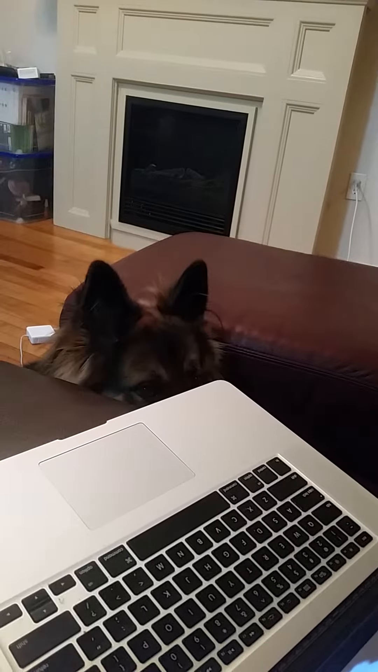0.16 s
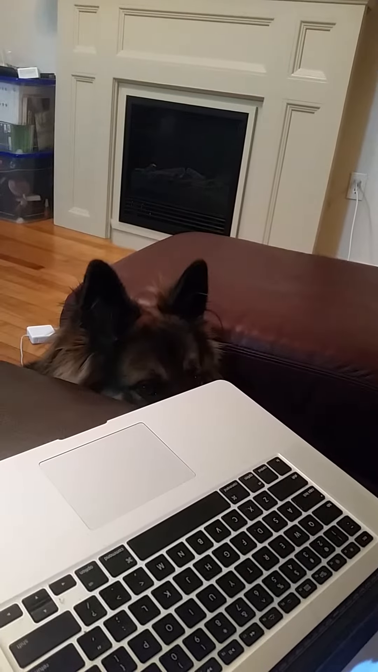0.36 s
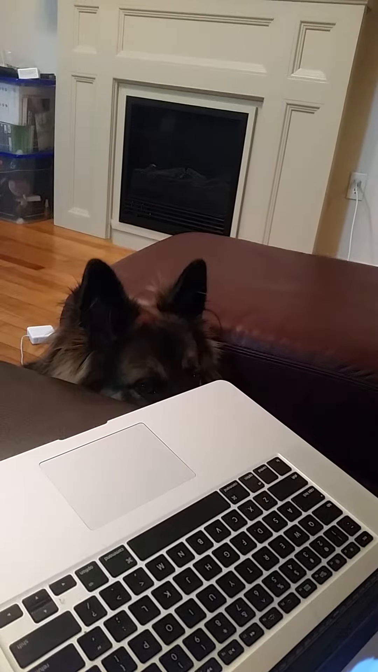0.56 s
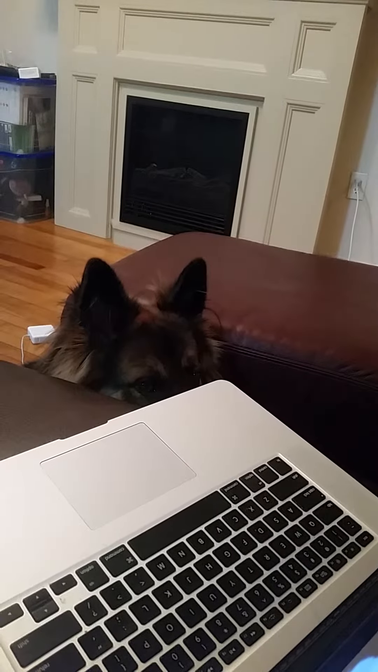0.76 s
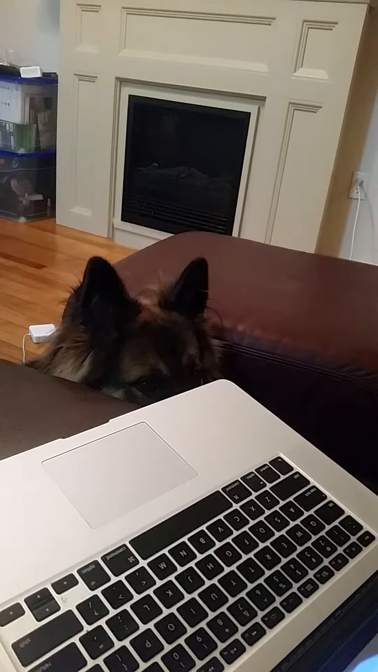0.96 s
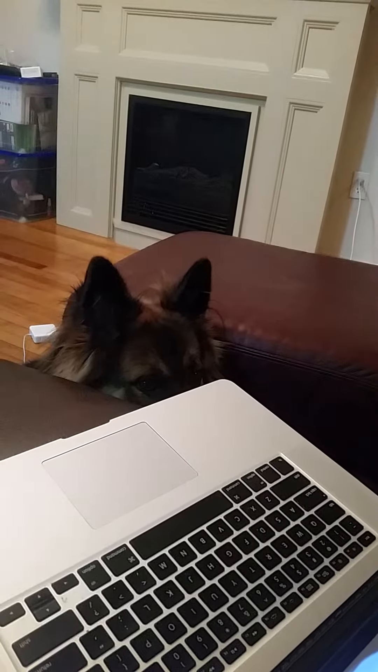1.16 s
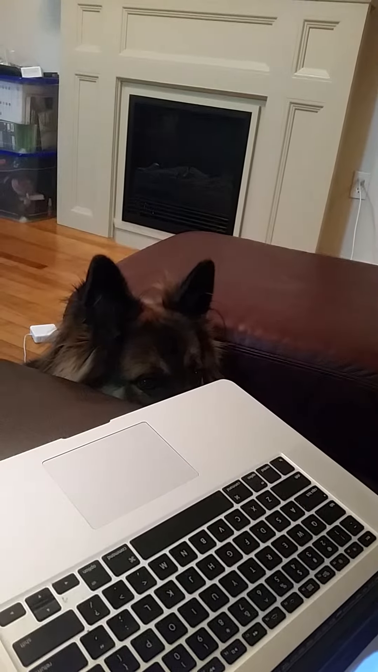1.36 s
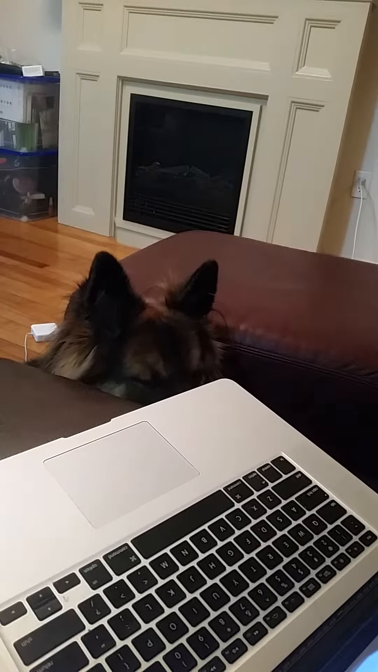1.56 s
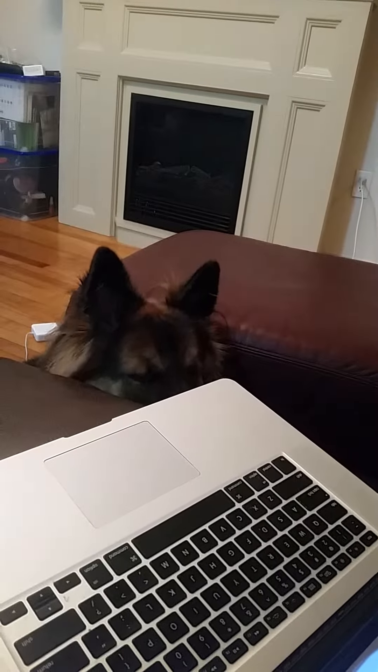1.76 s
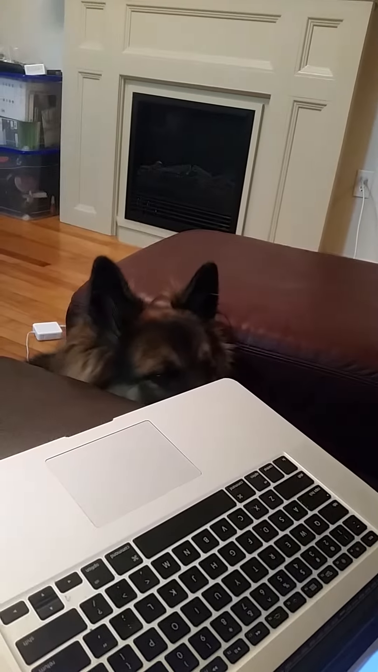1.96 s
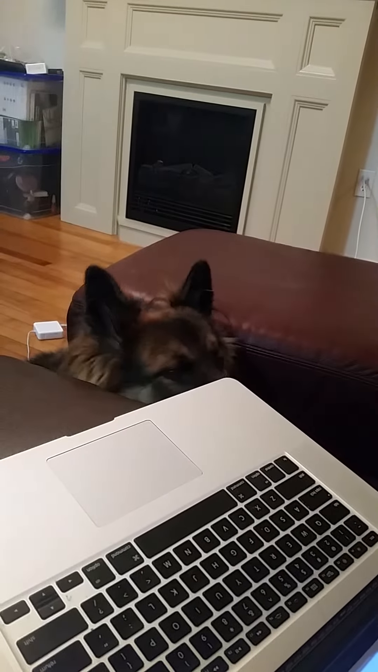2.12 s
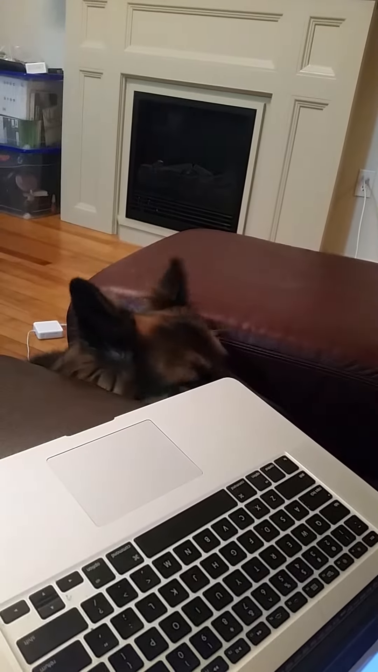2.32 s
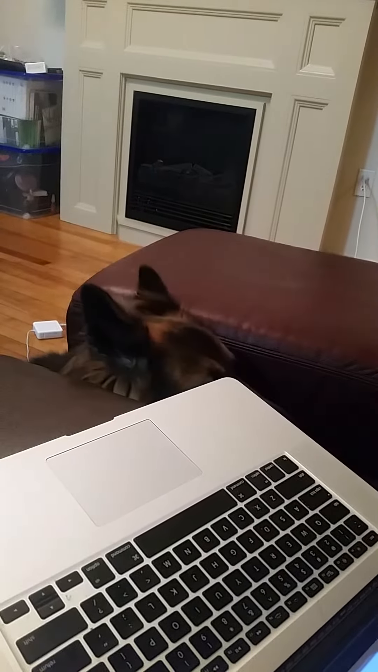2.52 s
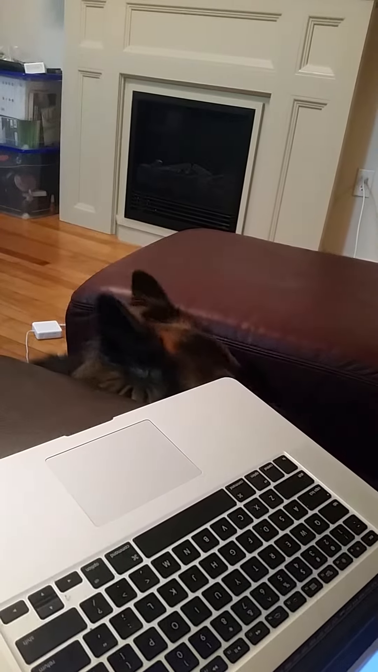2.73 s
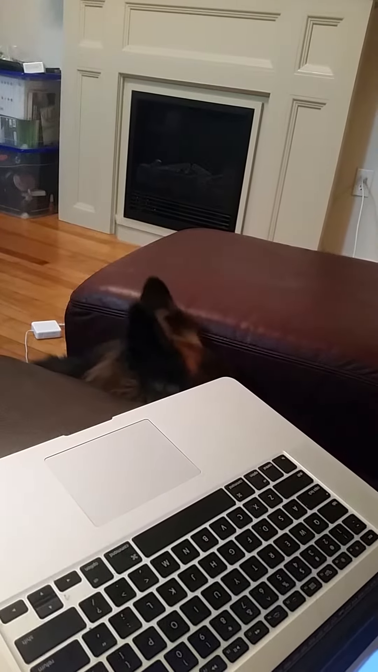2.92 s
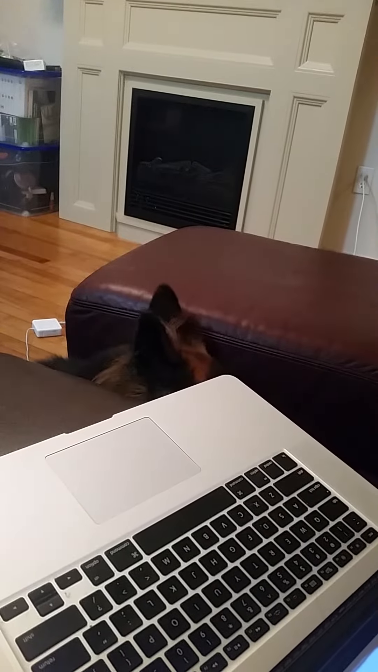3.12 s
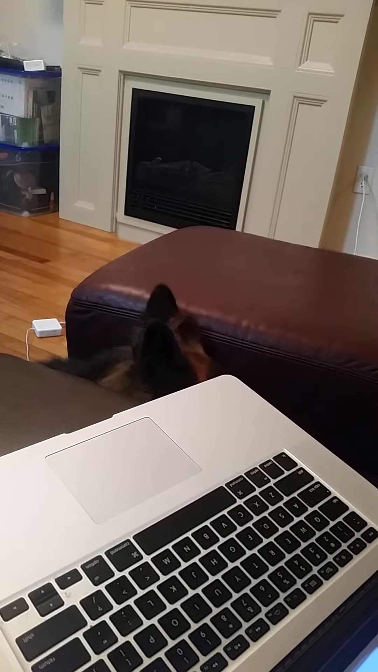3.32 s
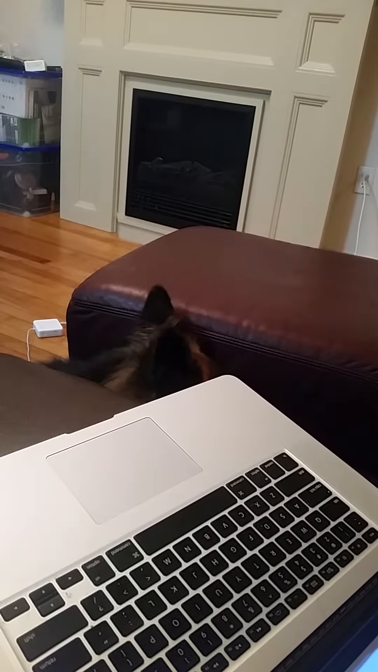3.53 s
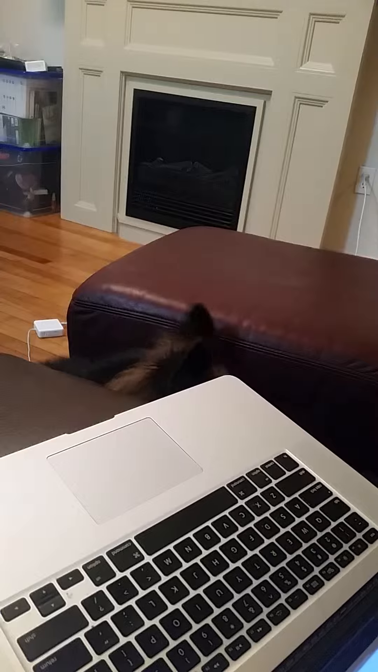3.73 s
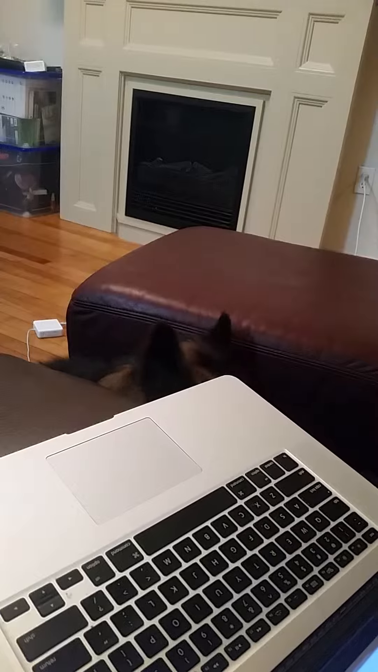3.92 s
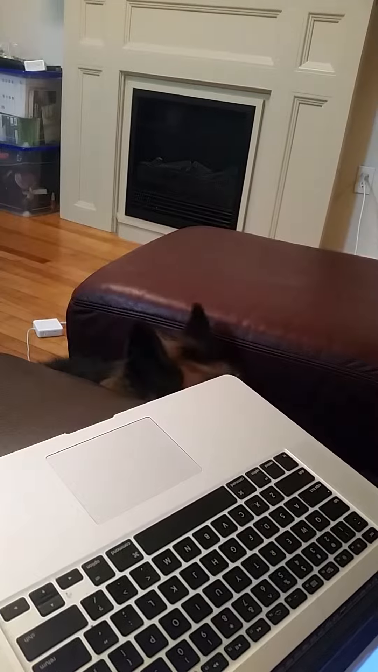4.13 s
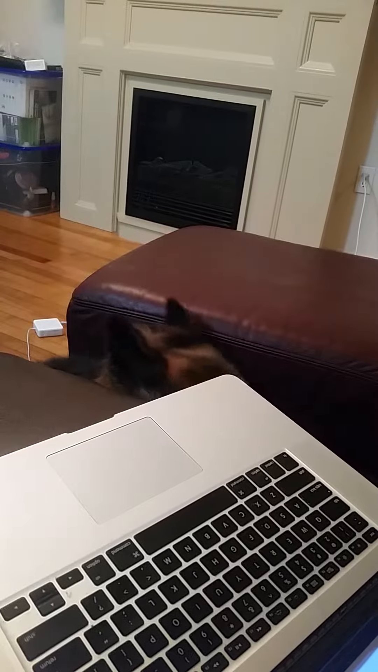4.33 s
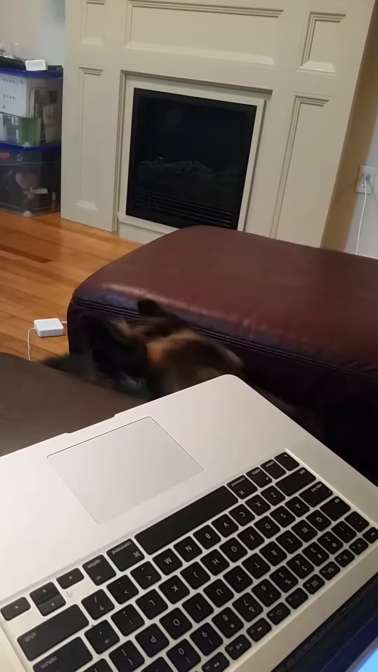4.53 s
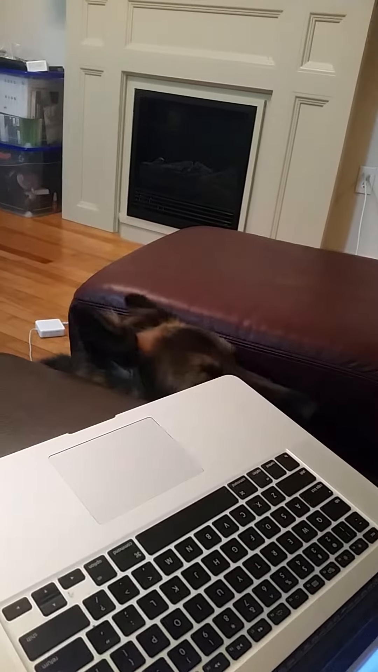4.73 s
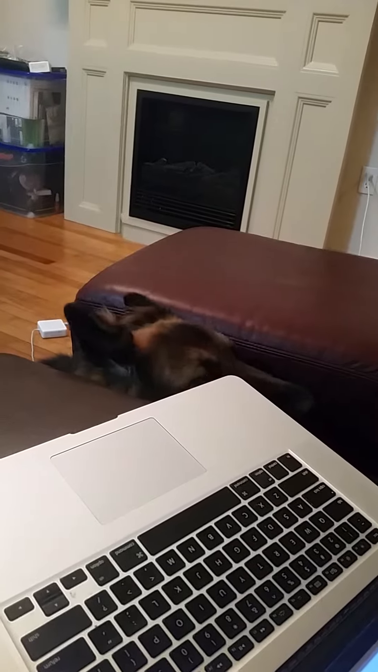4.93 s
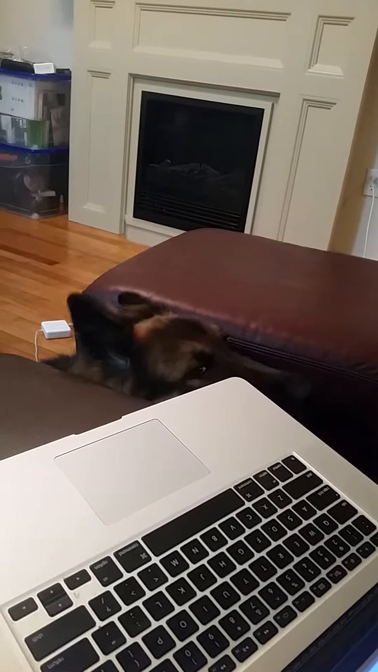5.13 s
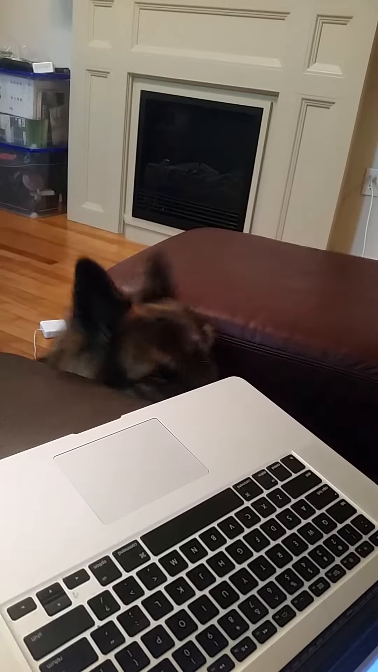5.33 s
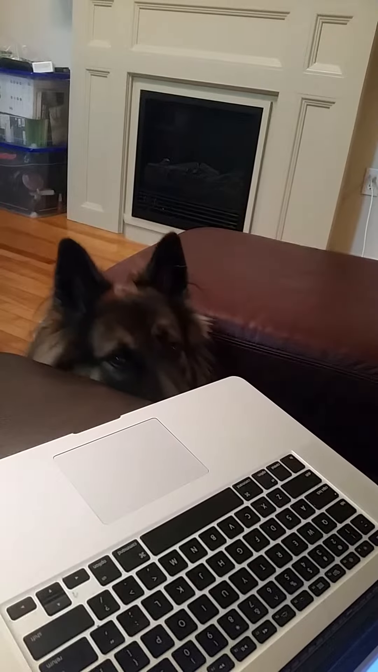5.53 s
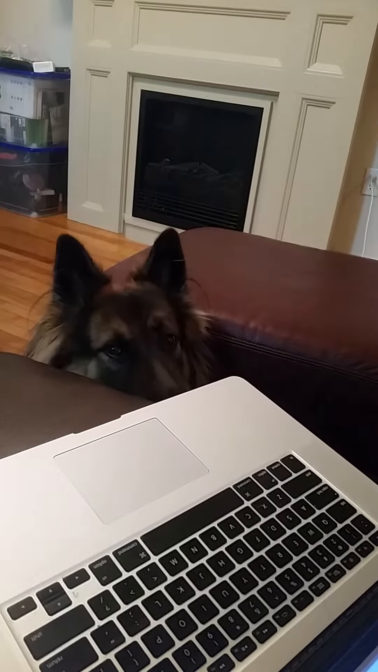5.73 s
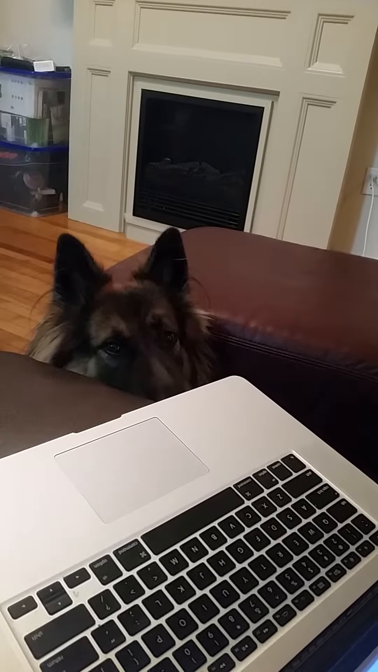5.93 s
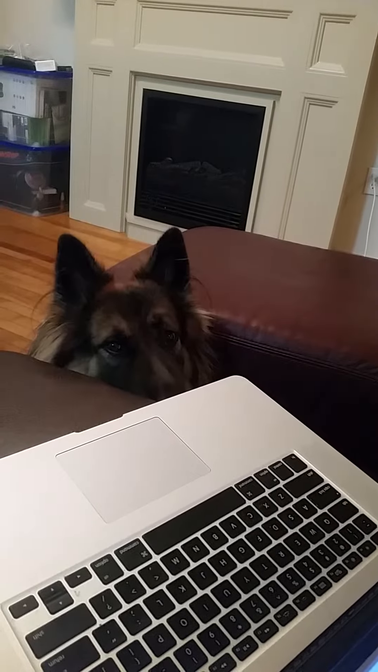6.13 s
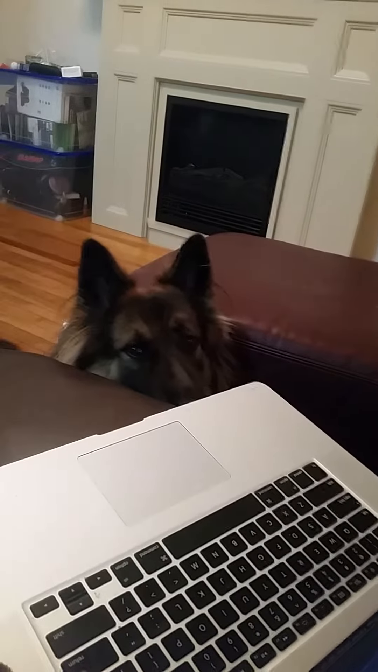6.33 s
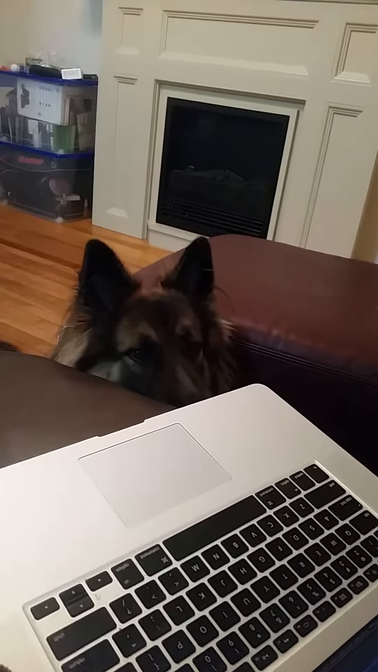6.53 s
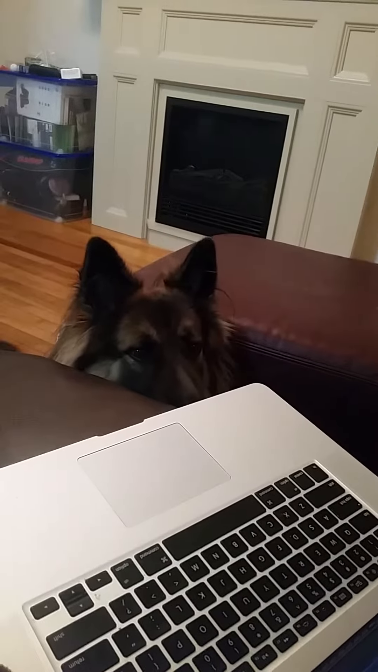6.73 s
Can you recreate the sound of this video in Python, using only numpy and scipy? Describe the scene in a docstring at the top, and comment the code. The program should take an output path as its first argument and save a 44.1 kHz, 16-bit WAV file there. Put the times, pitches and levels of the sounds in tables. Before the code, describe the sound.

Two mournful, almost pure-toned dog howls slide upward and sink into low creaks, with sniffs, faint whines, dull handling thumps and a steady background hum.

```python
"""A dog howls twice and whines in a quiet living room, a little to the right of a hand-held phone.
Its voice is nearly a pure tone with a few resonance-shaped overtones, nose hiss and breath.
Thin whistles, squeaks, a faint moan and sniffs join it; decaying noise serves as the room's echo.
Fingers thump the phone's body as damped low sines.
Fan noise, rumble and a mains hum fill the background."""
import sys
import numpy as np
from scipy import signal
from scipy.fft import rfft, irfft, next_fast_len
from scipy.io import wavfile
from scipy.ndimage import uniform_filter1d, minimum_filter1d, map_coordinates

SR = 44100
rng = np.random.default_rng(int(sys.argv[2]) if len(sys.argv) > 2 else 0)


def gain_from_db(level_db):
    """Turn a decibel level (scalar or array-like) into a linear amplitude factor."""
    decades = np.asarray(level_db, float) / 20
    return 10 ** decades


def int16_out(signal):
    """Quantize to a 16-bit WAV file."""
    q = np.round(np.clip(np.atleast_2d(signal).T, -1, 1) * 32767)
    wavfile.write(sys.argv[1], SR, q.astype(np.int16))


N = 298468

# turbulent air around 6.7 kHz: (frequency [Hz], relative density [dB per Hz])
JET_COLOUR = [(5300, -26), (6000, -3), (6700, 6.5), (7400, -8), (7800, -38)]


def unit(x):
    """Scale to rms 1."""
    return x / np.sqrt(np.mean(x ** 2) + 1e-20)


def along(points, hz):
    """Read (Hz, value) points on a log frequency axis."""
    f, v = np.transpose(points)
    return np.interp(np.log(hz + 1), np.log(f + 1), v)


def curves(rows):
    """A gate open only inside the table's span, and one value per sample for each column."""
    s, *cols = np.transpose(rows)
    t = np.arange(N) / SR
    gate = np.clip(np.minimum(t - s[0], s[-1] - t) / 0.004, 0, 1)
    return gate, [np.interp(t, s, c) for c in cols]


def wobble(knots_per_s):
    """A smooth random curve."""
    knots = rng.standard_normal(int(N * knots_per_s / SR) + 4)
    return map_coordinates(knots, [np.arange(N) * knots_per_s / SR])


def filtered(x, response):
    """x times a response of frequency."""
    m = next_fast_len(N + 8192)
    return irfft(rfft(x, m) * response(np.fft.rfftfreq(m, 1 / SR)), m)[..., :N]


def noise(colour):
    """Coloured noise of rms 1."""
    return unit(filtered(rng.standard_normal(N), lambda hz: gain_from_db(along(colour, hz))))


def turning(hz):
    """Running phase of a pitch curve."""
    return 2 * np.pi * np.cumsum(hz) / SR


def call(gate, hz, partials, nose_db, ring_db, breath_db, jitter, top_hz):
    """One call: low partials, unsteady overtones and hiss through the nose resonances, and breath."""
    # nose-shaped overtones: (frequency [Hz], relative level [dB])
    overtones = [(1650, -39), (2800, -15), (4000, -2.5), (4770, 6), (5850, -8.5), (6300, -13), (8190, -59),
                 (13900, -120)]
    # hiss in the nose: (frequency [Hz], relative density [dB per Hz])
    nose_colour = [(2300, -43), (3100, 0), (4000, -13), (5200, 9.5), (5900, -13.5), (7000, -17.5),
                   (7900, -22.5), (8600, -44), (10500, -37), (12500, -18.5), (15500, -23)]
    # breath: (frequency [Hz], relative density [dB per Hz])
    breath_colour = [(90, -36.5), (200, -10), (290, 1.5), (420, 0.5), (700, -0.5), (1200, -10.5),
                     (2000, -16.5), (2600, -18.5), (3400, -46.5)]

    # the folds start unevenly: pitch scatters for the first moments
    age_s = np.cumsum(gate > 0) / SR
    scatter = jitter + .04 * np.exp(-age_s / .04)
    phase = turning(hz * (1 + scatter * wobble(70)))
    low = sum(gain_from_db(db + 1.9 * wobble(40)) * np.sin(k * phase) * (k * hz < top_hz) for k, db in partials)

    # high overtones come and go, need effort, and leave only hiss when the pitch drops
    effort = np.clip((partials[0][1] + 32) / 12, .1, 1)
    firm = np.clip((hz - 480) / 180, 0, 1) * effort
    high = sum(gain_from_db(along(overtones, k * hz) + 7 * wobble(13)) * np.sin(k * phase + .9 * wobble(60))
               for k in range(5, 11))
    hiss = gain_from_db(-9.5 + 0.88 * wobble(37)) * noise(nose_colour)
    nose = gain_from_db(nose_db) * (gain_from_db(ring_db) * firm * high + hiss)

    breath = gain_from_db(breath_db + 0.5 * partials[0][1] + 1.5 * wobble(25)) * noise(breath_colour)
    return gate * (np.sqrt(2) * low + nose + breath)


def sheen(hz):
    """The topmost overtones flare at high pitch: rough tone and air in a nose resonance near 7 kHz."""
    # (four knot times [s]: faint, full, full, faint; relative level [dB]);
    # the second flare's gate closes at 4.4 s, before its third knot
    flares = [(1.893, 2.012, 2.25, 2.8, -56), (3.92, 4.0, 4.8, 4.4, -69)]
    edge_db = -23.5 * np.array([1, 0, 0, 1])
    rows = [list(zip(times, db + edge_db)) for *times, db in flares]
    level = sum(gate * gain_from_db(db) for gate, (db,) in map(curves, rows))
    phase = turning(hz * (1 + 0.0033 * wobble(70)))

    def caught(k):
        return gain_from_db(5 * wobble(15) - 24 * ((k * hz - 7150) / 1000) ** 2)

    tones = sum(caught(k) * np.sin(k * phase + 2.4 * wobble(67)) for k in range(8, 14))
    return level * (tones + gain_from_db(-7 + 2.0 * wobble(35)) * noise(JET_COLOUR))


def howl(rows):
    """Overtones sound where they cross the mouth, throat and a higher resonance."""
    # throat resonance: (frequency [Hz], relative level [dB])
    throat_shape = [(100, -58.5), (1400, -30.5), (1750, -2), (2000, -2), (2300, -4), (2600, -28.5),
                    (2850, -34.5), (3400, -28.5)]
    # higher resonance: (frequency [Hz], level against the fundamental [dB])
    upper_shape = [(1900, -80), (2300, -43), (2650, -42), (2900, -69.5)]
    mouth_width = 0.23  # relative to the resonance frequency
    creak_hz, creak_span_hz = 260, 100

    gate, (hz, db, mouth_hz, mouth_db, throat_db) = curves(rows)
    smooth = np.clip((hz - creak_hz) / creak_span_hz, 0, 1)
    # overtones fall off gently in a creak, steeply in a smooth tone
    step_db = 5 + 39.5 * np.clip((hz - creak_hz / 2) / creak_span_hz, 0, 1)
    # the higher resonance opens only as the pitch sinks below 575 Hz
    upper_open = np.clip((575 - hz) / 29, 0, 1)

    def passed_db(k):
        f = k * hz
        folds = gain_from_db(db - (k - 1) * step_db)
        upper = gain_from_db(db + along(upper_shape, f)) * upper_open
        detuning = (f / mouth_hz - mouth_hz / f) / (2 * mouth_width)
        mouth = gain_from_db(mouth_db) / (1 + detuning ** 2) ** 2
        throat = gain_from_db(throat_db + along(throat_shape, f))
        return 20 * np.log10(folds + upper + mouth + throat)

    # below 210 Hz the fundamental carries poorly
    partials = [(1, db - .16 * np.clip(210 - hz, 0, None))]
    # partials 6-9 weaken outside the creak
    partials += [(k, passed_db(k) - 15 * smooth * (k > 5)) for k in range(2, 10)]
    voice = call(gate, hz, partials, nose_db=-53 + 0.28 * db, ring_db=-7, breath_db=-42.5,
                 jitter=0.0043, top_hz=3320)
    return voice + gate * sheen(hz)


def flutter():
    """A slack flap beats on the voice: its gain on the howls, and its own low note."""
    # (start [s], end [s], rate [Hz], depth [0-1], level of the flap's own note [dB])
    beats = [(1.771, 1.88, 71.4, 0.4, -62), (2.598, 2.724, 108.2, 0.56, -45.5),
             (3.628, 3.814, 33.94, .7, -73.5)]
    # the howl cuts out briefly: (time [s], half width [s])
    catches = [(1.556, 0.019), (1.658, 0.026), (3.129, 0.0055)]
    t = np.arange(N) / SR
    gain, note = np.ones(N), np.zeros(N)
    for start, end, hz, depth, db in beats:
        swell = np.sqrt(np.sin(np.pi * np.clip((t - start) / (end - start), 0, 1)).clip(0))
        beat = np.sin(2 * np.pi * hz * t + .5 * wobble(40))
        gain *= 1 + depth * swell * beat
        note += np.sqrt(2) * gain_from_db(db) * swell * beat
    for s, width in catches:
        gain *= 1 - np.exp(-((t - s) / width) ** 2)
    return gain, note


def howls():
    """Two howls through the fluttering, catching throat."""
    # per howl: (time [s], pitch [Hz], fundamental [dB], mouth resonance [Hz], its top [dB],
    # drive of the throat resonance [dB])
    howl_rows = [
        [(1.55, 195, -34, 500, -46, -73), (1.61, 223.5, -32, 450, -43.5, -70.5),
         (1.67, 274.9, -35.5, 544, -39.5, -71), (1.73, 383.9, -29, 1090, -51.5, -85.5),
         (1.8, 449, -33.5, 968, -54.5, -59), (1.82, 545, -30, 1074, -43.5, -64.5),
         (1.87, 608.6, -33.5, 1240, -56.5, -66.5), (1.965, 669.2, -22.5, 1334, -47.5, -48),
         (2.02, 640, -23, 1280, -51.5, -37), (2.09, 652.7, -15, 1300, -40.5, -29),
         (2.18, 659.7, -19.5, 1335, -46, -38.5), (2.25, 678.3, -15, 1380, -43.5, -33),
         (2.33, 671.5, -12.5, 1305, -25.5, -51.5), (2.39, 589.5, -17, 1153, -24, -44),
         (2.46, 498, -18.5, 994, -46, -60.5), (2.54, 487.8, -16.5, 970, -37.5, -55),
         (2.62, 493.3, -25, 950, -29.5, -38.5), (2.68, 500.6, -21, 994, -31.5, -63.5),
         (2.72, 533, -14, 1080, -28.5, -52), (2.76, 534.6, -5.5, 1300, -31.5, -51.5),
         (2.79, 498.1, -12.5, 1430, -26.5, -34), (2.85, 484, -10.5, 1361, -24, -48),
         (2.91, 461.2, -15.5, 1110, -18.5, -42), (2.96, 352, -23.5, 710, -28.5, -43.5),
         (3.03, 260.7, -37, 790, -48, -55), (3.09, 225.2, -27.5, 500, -65, -72),
         (3.14, 135, -36.5, 1080, -54.5, -56), (3.21, 125.2, -44, 1080, -51, -55),
         (3.27, 119.3, -49, 1000, -83, -66)],
        [(3.635, 330, -59, 650, -55, -85), (3.65, 346, -42, 700, -47, -75.5),
         (3.685, 374, -40.5, 900, -40, -75.5), (3.71, 348.4, -38, 900, -45, -69.5),
         (3.8, 450.4, -46.5, 910, -58, -73.5), (3.87, 600, -41, 1200, -43.5, -61.5),
         (3.92, 790, -20.5, 1570, -44, -69.5), (3.95, 820.6, -19, 1602, -36.5, -70),
         (4.04, 738, -18, 1488, -40, -62.5), (4.065, 734.3, -11, 1470, -43, -35),
         (4.11, 727, -14, 1450, -38.5, -35.5), (4.17, 715, -14, 1425, -29, -39),
         (4.21, 683.2, -16.5, 1345, -29, -40), (4.33, 648, -13, 1304, -30, -54),
         (4.38, 593.8, -16.5, 1268, -60.5, -42), (4.47, 583.2, -18, 1200, -57.5, -53),
         (4.585, 593, -12.5, 1150, -59.5, -48), (4.61, 589.2, -16, 1160, -42, -54),
         (4.645, 562, -12, 1130, -35.5, -61), (4.68, 541.6, -8.5, 1078, -26.5, -53),
         (4.72, 510.5, -14.5, 1255, -35.5, -59), (4.737, 463.1, -8.5, 1380, -29.5, -44),
         (4.8, 468, -11.5, 1350, -32, -36.5), (4.87, 386.4, -13, 1178, -31.5, -56),
         (4.93, 367.1, -14.5, 899, -42.5, -45.5), (5.02, 347.2, -25.5, 750, -41, -55),
         (5.1, 355.4, -15.5, 870.5, -35.5, -51), (5.14, 384.6, -11.5, 1120, -43.5, -45),
         (5.18, 420.6, -11, 1190, -32.5, -44), (5.23, 419.1, -16, 890, -27.5, -53.5),
         (5.26, 379.9, -21, 770, -21.5, -30.5), (5.3, 372.5, -19, 763, -33, -36.5),
         (5.345, 353, -23, 850, -29, -45), (5.38, 282.4, -30.5, 863.6, -33.5, -46),
         (5.42, 226.2, -32.5, 706.6, -34.5, -51.5), (5.46, 150.6, -30.5, 500, -37.5, -59),
         (5.5, 107.8, -34.5, 300, -42, -59), (5.62, 75.4, -47, 227, -72, -68)],
    ]
    gain, note = flutter()
    return gain * sum(howl(rows) for rows in howl_rows) + note


def whine(rows):
    """A soft call with few partials; the sixth rings where it meets a nose resonance."""
    # (partial number, level against the overtones [dB])
    steps = [(2, -0.5), (3, -12)]
    # nose resonance: frequency [Hz], width [Hz], level against the overtones [dB]
    nose_ring = (3660, 170, -16.5)
    gate, (hz, db, overtones_db) = curves(rows)
    ring_hz, width_hz, ring_db = nose_ring
    partials = [(1, db)]
    partials += [(k, overtones_db + step_db) for k, step_db in steps]
    partials += [(6, overtones_db + ring_db - 6 * ((6 * hz - ring_hz) / width_hz) ** 2)]
    return call(gate, hz, partials, nose_db=-63, ring_db=-4, breath_db=-48.5, jitter=0.0025, top_hz=4200)


def whines():
    """Soft whines around the howls."""
    # per whine: (time [s], pitch [Hz], fundamental [dB], overtones [dB])
    whine_rows = [
        [(1.205, 350, -49, -38), (1.227, 397.4, -41.5, -48), (1.245, 467, -45, -49), (1.27, 558, -52, -47),
         (1.31, 602, -49, -52.5), (1.41, 615, -46.5, -44), (1.485, 590, -47, -50), (1.56, 575, -48, -40.5),
         (1.63, 501, -45.5, -56)],
        [(6.04, 424, -48, -55), (6.081, 346, -47.5, -45), (6.16, 596, -51.5, -68), (6.245, 565, -43, -69),
         (6.43, 590.6, -50.5, -54.5), (6.46, 563, -66, -80)],
        [(6.632, 684, -29, -57), (6.646, 616, -46.5, -86), (6.668, 634, -47.5, -47), (6.726, 665, -45, -99),
         (6.768, 707, -43, -69)],
    ]
    return sum(whine(rows) for rows in whine_rows)


def line(rows, jitter, octave_db):
    """A thin unsteady tone with a weak octave."""
    gate, (hz, db) = curves(rows)
    phase = turning(hz * (1 + jitter * wobble(120)))
    tone = np.sin(phase) + gain_from_db(octave_db) * np.sin(2 * phase)
    return gate * gain_from_db(db + 0.5 + 4.1 * wobble(45)) * tone


def whistle():
    """A thin nasal tone riding on a band of turbulent air."""
    # per whistle: (time [s], pitch [Hz], relative level [dB])
    whistle_rows = [
        [(2.55, 6700, -66.5), (2.61, 6900, -64), (2.66, 6680, -61), (2.81, 7050, -54.5), (2.85, 6780, -49.5),
         (3.12, 6950, -81.5)],
        [(4.3, 6600, -72.5), (4.38, 6620, -56), (4.52, 6511, -77), (4.72, 6560, -55.5), (4.775, 6550, -38),
         (4.91, 6535, -62), (5.03, 6620, -68.5), (5.14, 6600, -65), (5.175, 6600, -50.5), (5.23, 6670, -60.5),
         (5.43, 6700, -79.5)],
    ]
    tone = sum(line(rows, jitter=.007, octave_db=-40) for rows in whistle_rows)
    air_level = sum(gate * gain_from_db(0.61 * db - 29.5) for gate, (hz, db) in map(curves, whistle_rows))
    return tone + air_level * noise(JET_COLOUR)


def squeaks():
    """Thin gliding tones on the breath."""
    # (time [s], length [s], from [Hz], to [Hz], relative level [dB])
    glides = [(0.923, 0.11, 4110, 3980, -63), (6.605, .035, 3650, 3530, -63),
              (6.699, .078, 3820, 3752, -60)]
    return sum(line([(s, from_hz, db), (s + length, to_hz, db)], jitter=0.0018, octave_db=-40)
               for s, length, from_hz, to_hz, db in glides)


def moan():
    """A faint low tone with a marked octave."""
    # (time [s], pitch [Hz], relative level [dB])
    moan_rows = [(0, 256.3, -47.5), (.17, 268.1, -53.5), (.29, 233.3, -44), (.45, 208.2, -56.5),
                 (.54, 226.3, -62), (.66, 212.1, -51.5), (.75, 246.7, -55.5), (.98, 217.1, -48),
                 (1.2, 230, -57.5)]
    return line(moan_rows, jitter=0.009, octave_db=-7.5)


def sniffs():
    """Bursts of coloured noise with a sharp onset and exponential decay."""
    # (time [s], level at onset [dB], t60 [s])
    puffs = [(.826, -62, 0.44), (0.982, -59, 0.28), (1.142, -59, 0.25), (3.27, -53, 0.096),
             (3.4, -63.5, 0.6), (6.04, -70, 0.12), (6.61, -62.5, 0.098)]
    # (frequency [Hz], relative density [dB per Hz])
    sniff_colour = [(300, -18), (1000, -8), (2500, 3.5), (4000, 0.5), (5500, 3.5), (7000, -11), (9500, -29),
                    (12800, -12), (15500, -12)]
    t = np.arange(N) / SR
    level = sum(gain_from_db(db - 60 * np.abs(t - s) / t60) * (t > s) for s, db, t60 in puffs)
    return level * noise(sniff_colour)


def dog():
    """All sounds of the dog, mono and dry."""
    return howls() + whines() + whistle() + squeaks() + moan() + sniffs()


def room(x):
    """Echo by decaying noise: each frequency has its own strength and dies at its own speed."""
    # (frequency [Hz], t60 [s])
    decay = [(150, 0.57), (600, 0.44), (2000, 0.54), (7000, 0.22)]
    # (frequency [Hz], echo level [dB])
    wetness = [(150, -6.5), (400, -10.5), (900, -8.5), (2500, -2), (7000, 0.5)]
    hz, t, z = signal.stft(rng.standard_normal((2, SR // 2)), SR, nperseg=256)
    tail = signal.istft(z * gain_from_db(-60 * t / along(decay, hz)[:, None]), SR, nperseg=256)[1]
    tail = tail / np.linalg.norm(tail[0])
    delayed = np.pad(x, (350, 0))[None]  # samples
    wet = signal.fftconvolve(delayed, tail, axes=1)[:, :N]
    return filtered(wet, lambda f: gain_from_db(along(wetness, f)))


def thumps():
    """Fingers shift on the phone: a damped low sine each, uneven and out of step on the two ports."""
    # (time [s], relative level [dB], frequency [Hz], left-right difference [dB])
    pushes = [(0.426, -43, 105, -6), (1.634, -35, 83, 10), (3.568, -46, 116, -4), (4.448, -42.5, 123, 12.5),
              (4.54, -34, 113, 10.5), (4.61, -47.5, 37.4, 10), (4.68, -46, 43, 6), (4.825, -39.5, 113, 15),
              (4.869, -43, 38, 6.5), (5.009, -37.5, 99, -2), (5.089, -31.5, 77.4, 1),
              (5.129, -35.5, 128, 4), (5.17, -39.5, 91.5, 5), (5.22, -49, 114, 11), (5.758, -62.5, 74.9, 6),
              (6.293, -34.5, 53.8, 7), (6.511, -46.5, 42.7, 7)]
    out, t = np.zeros((2, N + SR)), np.arange(SR // 4) / SR
    for s, db, hz, pan_db in pushes:
        envelope = np.exp(-t * hz / .6) * (1 - np.exp(-t / 0.0052))
        push = np.sin(2 * np.pi * hz * t + [[0], [1.6]]) * envelope
        gain = gain_from_db(db + 13 + np.array([[pan_db], [-pan_db]]) / 2)
        out[:, round(s * SR):][:, :len(t)] += gain * push
    return out[:, :N]


def fan():
    """Stereo fan noise with slight patches in time and frequency and a slow drift."""
    # (time [s], level [dB])
    air_level = [(0, -47), (.8, -51.5), (1.9, -47), (3.3, -48.5), (3.6, -49.5), (4.3, -46), (5.5, -48),
                 (6.77, -51.5)]
    # (frequency [Hz], relative density [dB per Hz])
    air_colour = [(88, -42), (150, -13), (209, -5.5), (474, -12), (519, -7.5), (552, -14.5), (1330, -18),
                  (1830, -36), (2790, -34), (3100, -34), (4010, -24), (5600, -38), (7280, -83),
                  (12300, -120)]
    # (frequency [Hz], left-right likeness [-1 to 1])
    alike = [(60, 1), (240, 0.62), (950, 0.24), (3770, -0.01), (15000, -0.77)]
    # (frequency [Hz], left-right difference [dB])
    lean = [(60, -12.5), (240, -9.5), (950, -6), (3770, 4), (15000, 2)]
    z = signal.stft(rng.standard_normal((2, N)), nperseg=512)[2]
    patches = uniform_filter1d(uniform_filter1d(rng.standard_normal(z.shape[1:]), 5, 0), 10, 1)
    pair = signal.istft(z * gain_from_db(1.6 * unit(patches)), nperseg=512)[1][:, :N]

    def mid_side(hz):
        angle = np.arccos(np.clip(along(alike, hz), -1, 1)) / 2
        return gain_from_db(along(air_colour, hz)) * [np.cos(angle), np.sin(angle)]

    mid, side = filtered(pair, mid_side)
    sides = np.array([mid + side, mid - side])
    sides = filtered(sides, lambda hz: gain_from_db(along(lean, hz) * [[.5], [-.5]]))
    return gain_from_db(curves(air_level)[1][0] + 1.07 * wobble(2.5)) * unit(sides)


def rumble():
    """The deepest noise, independent at the two ports."""
    # (frequency [Hz], relative density [dB per Hz])
    rumble_colour = [(15, -11), (30, 6), (60, 7), (95, 3), (140, -0.5), (220, -40.5)]
    level = gain_from_db(-58.5 + 2.0 * np.array([wobble(5), wobble(2.6)]))
    return level * [noise(rumble_colour), noise(rumble_colour)]


def mains_hum():
    """Electric tones, slightly unsteady, stronger on the right."""
    # (mean frequency [Hz], relative level [dB])
    tones = [(119.5, -56), (521, -69.5)]
    hum = sum(gain_from_db(db + 0.5 + 0.75 * wobble(1.7)) * np.sin(turning(hz + 0.2 * wobble(8.7)))
              for hz, db in tones)
    return hum * gain_from_db([[-2.5], [2.5]])


def scene():
    """The dog, slightly earlier on the right, with its echo, the thumps and the background."""
    # direct voice: (frequency [Hz], left-right difference [dB])
    dog_lean = [(150, -10.5), (400, -9), (800, -7), (1500, -7), (3000, -17), (6500, -25.5)]
    voice = dog()
    direct = np.array([np.pad(voice, (5, 0))[:N], voice])  # left lags by 5 samples
    direct = filtered(direct, lambda hz: gain_from_db(along(dog_lean, hz) * [[.7], [-.3]]))
    echo = gain_from_db([[-2], [2]]) * room(voice)
    return direct + echo + thumps() + fan() + rumble() + mains_hum()


def roll_off(x):
    """The treble ends steeply here."""
    return signal.sosfilt(signal.butter(12, 16420, fs=SR, output="sos"), x)


def record(dry):
    """The phone adds its own hiss, limits the highest peaks and keeps nothing above its band limit."""
    # (frequency [Hz], relative density [dB per Hz])
    hiss_colour = [(4000, -30), (5500, -8), (6000, -30), (8000, -30), (10000, -19), (12500, -6),
                   (15700, -7)]
    ceiling, look_s, top_hz = .95, .01, 15750
    x = dry + gain_from_db(-77.0) * np.array([noise(hiss_colour), noise(hiss_colour)])
    look = int(look_s * SR)
    needed = np.minimum(1, ceiling / (np.abs(x).max(0) + 1e-9))
    x = x * uniform_filter1d(minimum_filter1d(needed, size=2 * look), size=look)
    mix = filtered(x, lambda hz: hz < top_hz)
    return roll_off(mix)


dry = scene()
out = record(dry)
int16_out(out)
```